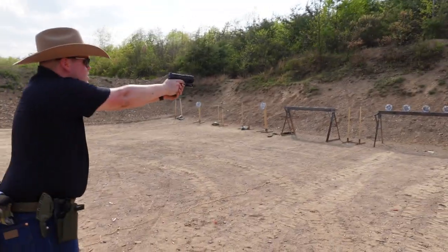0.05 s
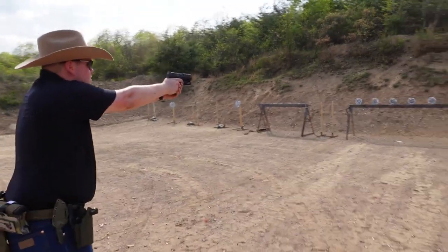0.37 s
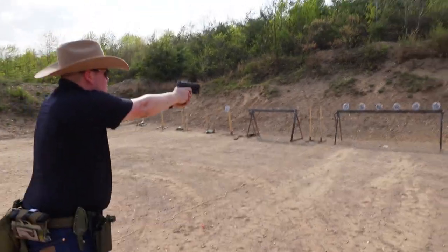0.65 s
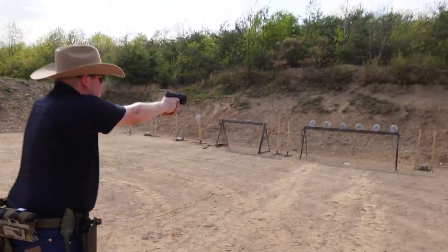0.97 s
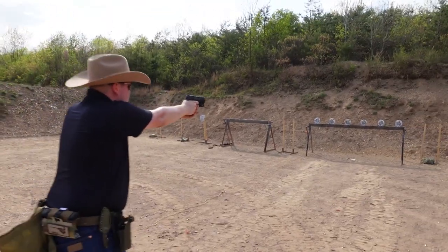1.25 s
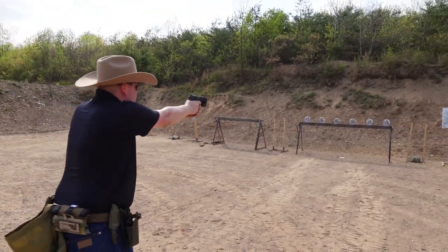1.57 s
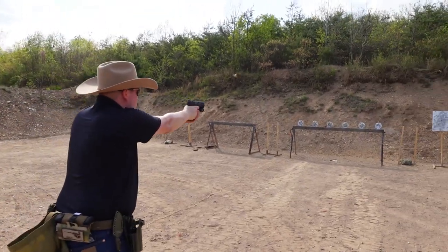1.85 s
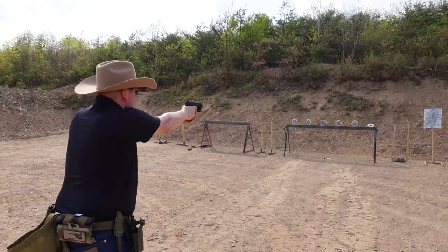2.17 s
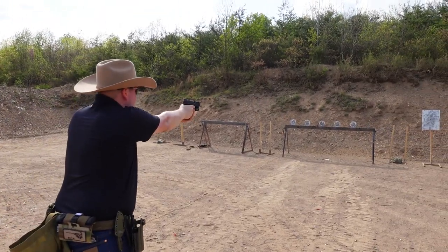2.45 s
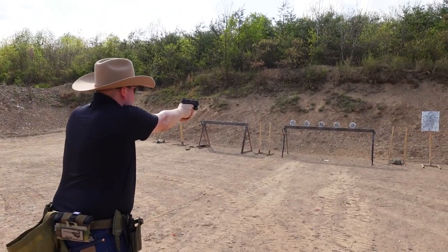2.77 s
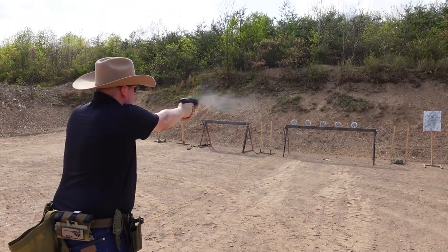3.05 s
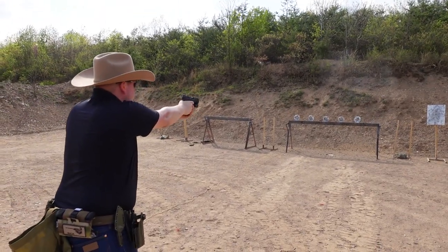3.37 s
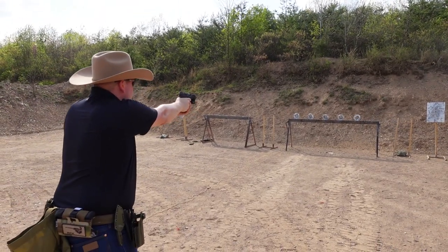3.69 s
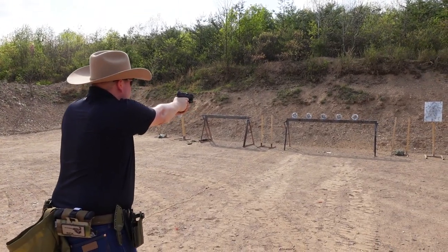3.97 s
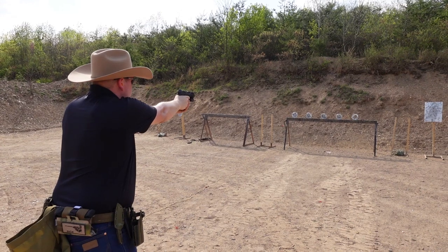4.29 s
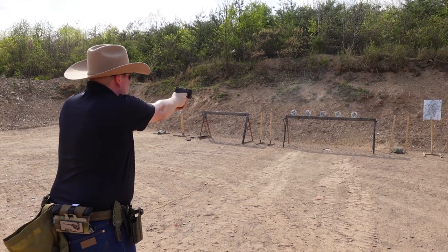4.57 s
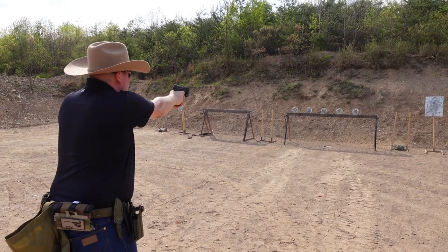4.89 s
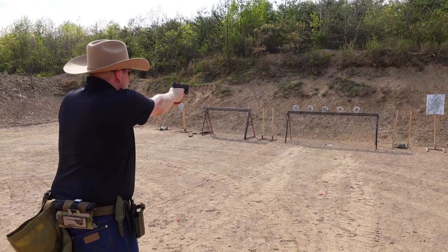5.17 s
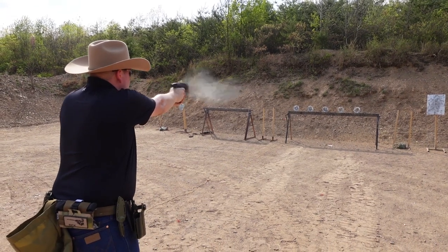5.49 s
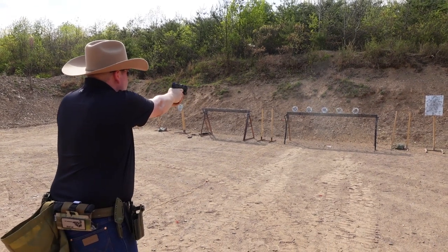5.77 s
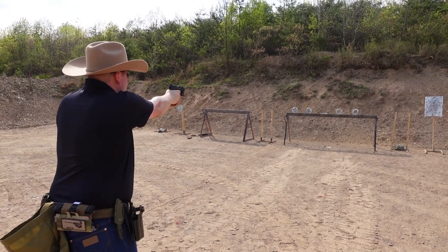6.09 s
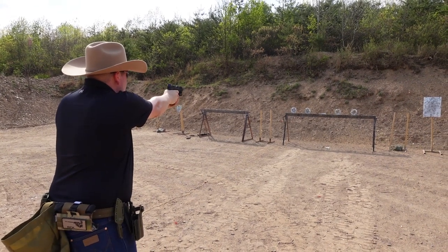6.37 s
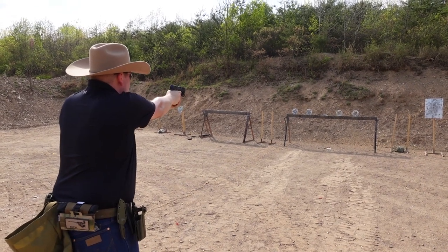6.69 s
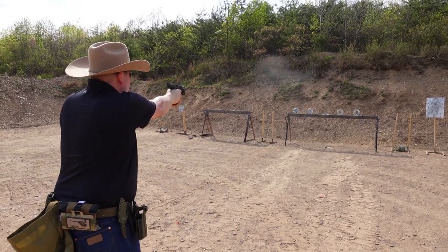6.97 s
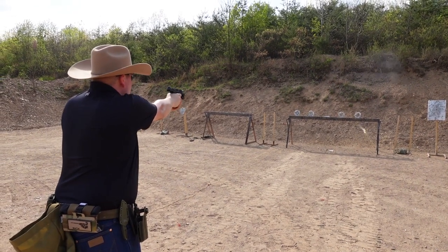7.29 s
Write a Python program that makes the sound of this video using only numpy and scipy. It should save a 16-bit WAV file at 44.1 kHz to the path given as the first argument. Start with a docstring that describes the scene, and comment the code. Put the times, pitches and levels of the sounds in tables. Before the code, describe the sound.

Light wind rumbles on the microphone and boots scuff faintly on dirt at an outdoor range. A nearby pistol then fires five single shots at a slow, even pace. Each sharp crack rolls back from the earth bank and woods, and a steel plate clangs and bounces on its rack just after. Two plates ring briefly when hit, and a few spent cases ping on the stones.

```python
"""Wind rumbles on the microphone at a dirt range, boots scuff and a bit of metal pings.
A trigger clicks and a pistol fires the first of five shots. Each crack comes back as a long roar from
the ground, the earth bank and the woods, then once more from a far hill. After each shot a steel plate
clangs on its rack and bounces; on the second and fourth shots the hit plate sings before it falls.
Among the later shots, spent cases ping on the stones."""
import sys
import numpy as np
from scipy import signal
from scipy.fft import rfft, irfft, next_fast_len
from scipy.io import wavfile
from scipy.ndimage import uniform_filter1d, map_coordinates

SR = 44100
rng = np.random.default_rng(int(sys.argv[2]) if len(sys.argv) > 2 else 0)


def inscribe(sig):
    """Save sig as 16-bit PCM at rate SR to the path in sys.argv[1].

    A 1-D sig is mono; a 2-D sig holds one channel per row.
    Samples are clipped to [-1, 1] before scaling.
    """
    pcm = np.round(np.clip(np.atleast_2d(sig).T, -1, 1) * 32767)
    wavfile.write(sys.argv[1], SR, pcm.astype(np.int16))


N = 332333
ECHO_SAMPLES = int(1.4 * SR)


def amp(db):
    """Turn decibels into a gain."""
    return 10 ** (np.asarray(db) / 20)


def unit(x):
    """Scale a sound to an average (rms) level of 1."""
    return x / np.sqrt(np.mean(x ** 2) + 1e-20)


def along(points, hz):
    """Read between the rows of a (pitch_hz, value) table."""
    pitches, values = np.transpose(points)
    return np.interp(np.log(hz + 1), np.log(pitches + 1), values)


def wobble(rate, size):
    """A smooth curve through `rate` random points a second."""
    knots = rng.standard_normal(int(size * rate / SR) + 4)
    return map_coordinates(knots, [np.arange(size) * rate / SR])


def filtered(x, response):
    """Turn each frequency up or down by response(hz)."""
    size = x.shape[-1]
    padded = next_fast_len(size + 8192)
    return irfft(rfft(x, padded) * response(np.fft.rfftfreq(padded, 1 / SR)), padded)[..., :size]


# how much left and right differ: pitch_hz, side_db
STEREO_WIDTH = [(60, -13), (250, -22.5), (500, -18), (2000, -15.5), (4000, -13.5), (8000, -10),
                (12000, -9.5)]
def noise(colour, size, width=STEREO_WIDTH, grain_db=0):
    """Stereo noise shaped by (pitch_hz, level_db) rows; grain_db makes it gritty."""
    white = rng.standard_normal((2, size)) * amp(grain_db * wobble(900, size))
    spread = lambda hz: np.array([np.ones_like(hz), amp(along(width, hz))])
    mid, side = filtered(white, lambda hz: amp(along(colour, hz)) * spread(hz))
    return unit(np.array([mid + side, mid - side]))


def add(track, start_s, sound):
    """Mix a sound into the track."""
    part = track[:, max(round(start_s * SR), 0):][:, :sound.shape[-1]]
    part += sound[..., :part.shape[-1]]


def swell(t, start_s, db, attack_s, hold_s, t60):
    """A gain that rises, holds and dies away; t60 is the seconds it takes to fade by 60 dB."""
    age = t - start_s
    return np.clip(age / attack_s, 0, 1) * amp(db - 60 * np.maximum(age - attack_s - hold_s, 0) / t60)


# loudness of the wind rumble (gusts, turned down by the recorder after the shots): time_s, level_db
RUMBLE_LEVEL = [(0.0, -45), (0.6, -46.5), (0.78, -53.0), (0.92, -44.5), (1.1, -48), (1.22, -42.0),
                (1.42, -42.5), (1.52, -55), (2.2, -57), (2.88, -44), (3.0, -54.5), (3.6, -68), (3.92, -61),
                (4.35, -57.5), (4.85, -51.5), (5.5, -53), (6.1, -64.5), (6.68, -70.5), (7.25, -63),
                (7.53, -69.5)]
# tone of the wind: pitch_hz, level_db
WIND_COLOUR = [(15, -49), (25, -34.5), (79, -1.5), (181, -0.5), (488, -13.5), (691, -18.5), (856, -27.5),
               (1180, -30.5), (1670, -35.5), (2070, -41), (3730, -46), (7090, -61.5), (15000, -66)]
# how much the wind differs left and right: pitch_hz, side_db
WIND_SPREAD = [(30, -5.5), (100, -5.5), (300, -1), (1000, -2), (8000, -2)]
def wind(wind_db, lumps_db, hiss_db):
    """Wind buffets the microphone; a faint steady hiss slowly dips and recovers with the recorder's level."""
    level = np.interp(np.arange(N) / SR, *np.transpose(RUMBLE_LEVEL))
    rush = noise(WIND_COLOUR, N, width=WIND_SPREAD)
    buffet = filtered(rush, lambda hz: 1 / (1 + (hz / 800) ** 4))
    slow_level = uniform_filter1d(level, size=SR // 2)
    hiss = amp(hiss_db + slow_level) * (rush - buffet)
    return amp(wind_db + level + lumps_db * wobble(24, N)) * buffet + hiss


def open_air():
    """The faint, steady hush of the air."""
    colour = [(100, -8.5), (700, 2.5), (2000, -18.5), (6000, -24.5), (10000, -30), (15000, -48)]
    return amp(-72.5) * noise(colour, N, width=WIND_SPREAD)


# boot scuffs: peak_s, level_db, length_s
BOOT_SCUFFS = [(0.128, -53.5, .013), (0.405, -63, .055), (.755, -59, .006), (0.782, -65.5, .016),
               (1.117, -55.5, 0.024)]
def boots():
    """Boots shift on the dirt in short puffs of gritty noise."""
    out, t = np.zeros((2, N)), np.arange(SR // 2) / SR
    colour = [(200, -5), (600, 3.5), (1000, -3.5), (2000, -7), (4500, -28), (12000, -48)]
    for peak_s, db, length_s in BOOT_SCUFFS:
        grit = noise(colour, len(t), grain_db=5)
        add(out, peak_s - 2 * length_s, amp(db) * grit * np.exp(-(t / length_s - 2) ** 2))
    return out


def tick(t, t60=.014):
    """A tiny metal tap: bright noise that dies at once."""
    colour = [(500, -13), (1800, 10.5), (4000, 4.5), (8000, -10), (12000, -11.5), (15000, -27)]
    return noise(colour, len(t)) * amp(-60 * t / t60)


# small metal pings: start_s, ring_db, pitch_hz, tick_db
METAL_PINGS = [(.9514, -60.5, 10890, -62), (3.9365, -66, 11020, -46.5), (5.225, -60.5, 10920, -49),
               (5.4116, -46, 10910, -45.5), (6.3743, -61, 10880, -48), (6.858, -28.5, 11170, -30.5)]
def pings(t60, split_hz):
    """Bits of metal, mostly cases landing, tick and ring with two close tones that beat."""
    out, t = np.zeros((2, N)), np.arange(SR // 2) / SR
    for start_s, ring_db, hz, tick_db in METAL_PINGS:
        ring = np.sin(2 * np.pi * (hz + split_hz) * t) + .38 * np.sin(2 * np.pi * (hz - split_hz) * t)
        ping = .6 * amp(ring_db - 60 * t / t60) * ring + amp(tick_db) * tick(t)
        add(out, start_s, ping * amp([[1.5], [-1.5]]))  # a little to the left
    return out


# trigger clicks: start_s, level_db
TRIGGER_CLICKS = [(1.6238, -46.5), (3.0657, -53), (4.3545, -58.5), (5.5088, -51), (6.731, -68),
                  (6.777, -54.5)]
def trigger():
    """The trigger gives way with a double click just before each shot."""
    out, t = np.zeros((2, N)), np.arange(SR // 2) / SR
    for start_s, db in TRIGGER_CLICKS:
        add(out, start_s, amp(db) * tick(t))
        add(out, start_s + .006, amp(db - 2.5) * tick(t))
    return out


# the shots: start_s, level_db
PISTOL_SHOTS = [(1.6455, -1.5), (3.0976, -1.5), (4.3877, -2.5), (5.5368, -4), (6.8015, -3.5)]
# tone of the crack and the striker: pitch_hz, level_db
GUN_COLOUR = [(60, -21), (400, -6), (1500, 7), (4000, -1), (8000, -7), (12000, -13.5), (16000, -26)]
def pistol(shared_echo, striker_db, crack_db, crack_s):
    """The striker ticks and the gun cracks; the land stays put, so shots share much of their echo."""
    out, t = np.zeros((2, N)), np.arange(SR // 20) / SR
    shared_roar = np.sqrt(shared_echo) * roar(dulling_db_per_s=17.5)
    for start_s, db in PISTOL_SHOTS:
        striker = amp(striker_db - 60 * t / .02) * noise(GUN_COLOUR, len(t))
        crack = amp(crack_db) * np.tanh(noise(GUN_COLOUR, len(t))) * np.exp(-(t / crack_s) ** 4)
        fresh_roar = np.sqrt(1 - shared_echo) * roar(dulling_db_per_s=18)
        slaps = slap_echoes(cycles=1.21, gain_db=-2.5, snap_db=-9)
        add(out, start_s - .0036, striker)
        add(out, start_s, amp(db) * crack)
        add(out, start_s, amp(db) * (shared_roar + fresh_roar + slaps))
    return out


def roar(dulling_db_per_s):
    """Countless small surfaces return the shot as one long roar."""
    t = np.arange(ECHO_SAMPLES) / SR
    return bank_echo(t) + boom(t) + woods_echo(t, dulling_db_per_s)


# tone of the bright echo: pitch_hz, level_db
BRIGHT_COLOUR = [(100, -32), (400, -10.5), (700, -1.5), (1100, 3.5), (1550, -4.5), (2200, 1), (3400, -1.5),
                 (5000, -4), (7000, -9), (10000, -18), (13000, -27.5), (16000, -44)]
def bank_echo(t, crest_s=.44, crest_width_s=.025, drop_db=-12):
    """Gravel, then the bank's stones and bushes, scatter the shot; less returns from past the crest."""
    gravel = swell(t, start_s=0, db=-26, attack_s=.001, hold_s=.08, t60=.5)
    bank = swell(t, start_s=.01, db=-21.5, attack_s=.088, hold_s=.047, t60=.91)
    crest = amp(drop_db * (1 + np.tanh((t - crest_s) / crest_width_s)) / 2)
    grit = noise(BRIGHT_COLOUR, len(t), grain_db=2) * amp(1.3 * wobble(160, len(t)))
    echo = crest * np.hypot(gravel, bank) * grit  # hypot adds their power
    soft = filtered(echo, lambda hz: 1 / (1 + (hz / 6500) ** 4))
    return soft + (echo - soft) * amp(-90 * np.maximum(t - .15, 0))  # farther bushes swallow the fizz


# tone of the boom: pitch_hz, level_db
DULL_COLOUR = [(25, -38.5), (60, -21), (120, -7), (280, -3), (430, -3), (600, 6), (900, -1.5), (1400, -4.5),
               (3000, -35.5), (8000, -70)]
def boom(t):
    """A dull thump around the shooter, then from the earth slope and the side mounds."""
    muzzle = swell(t, start_s=0, db=-26, attack_s=.001, hold_s=.004, t60=.29)
    slope = swell(t, start_s=.052, db=-23.5, attack_s=.013, hold_s=.041, t60=.16)
    mounds = swell(t, start_s=.087, db=-45.5, attack_s=.04, hold_s=.03, t60=.85)
    return np.sqrt(muzzle ** 2 + slope ** 2 + mounds ** 2) * noise(DULL_COLOUR, len(t))


# single faces of ground, bank, tree line and far hill: delay_s, level_db, pitch_hz
ECHO_FACES = [(.0058, -15.5, 562), (.0082, -18, 214), (.0538, -6, 1077), (.067, -10, 563), (.081, -10, 871),
              (.0959, -9.5, 839), (.098, -9, 478), (.1288, -13.5, 632), (.158, -7.5, 2110),
              (.163, -12.5, 750), (.186, -8.5, 1072), (.188, -16.5, 527), (.249, -23, 520),
              (.701, -31.5, 964), (.722, -26.5, 868), (.742, -30.5, 1170), (.765, -36.5, 790),
              (.817, -38, 845), (.886, -41.5, 1070)]
def slap_echoes(cycles, gain_db, snap_db):
    """Each face throws back a pulse of a wave or two with a gritty edge."""
    out, t = np.zeros((2, ECHO_SAMPLES)), np.arange(SR // 20) / SR
    for delay_s, db, hz in ECHO_FACES:
        loud, detune, shift = rng.standard_normal(3)
        turns = t * hz * (1 + .05 * detune)
        stretch = 1 + 2 * delay_s  # far slaps smear into thuds
        shape = np.sqrt(turns / stretch) * np.exp(-(turns / (cycles * stretch)) ** 2)
        pulse = np.sin(2 * np.pi * turns) * shape
        snap = amp(snap_db - 60 * t / (.0096 + .06 * delay_s)) * noise(TREE_COLOUR, len(t))
        air = signal.butter(2, min(2100 / (delay_s + .15), .45 * SR), fs=SR)  # far slaps lose treble
        slap = signal.lfilter(*air, pulse + snap)
        add(out, delay_s + .00018 * shift, amp(db + gain_db + 1.4 * loud) * slap)
    return out


# tone of the woods, also the grit of each slap: pitch_hz, level_db
TREE_COLOUR = [(60, -27), (300, -22), (560, -1), (800, 2), (1100, 2.5), (1550, -9), (2050, 2), (2600, -8.5),
               (3400, -5.5), (5000, -18.5), (8000, -53.5), (15000, -58)]
def woods_echo(t, dulling_db_per_s):
    """The woods answer, then the far hill; air dulls the longest paths."""
    trees = swell(t, start_s=.053, db=-32.5, attack_s=.1, hold_s=.17, t60=1.1)
    hill = swell(t, start_s=.69, db=-49.5, attack_s=.03, hold_s=.02, t60=1.12)
    echo = noise(TREE_COLOUR, len(t), grain_db=2) * amp(1.5 * wobble(70, len(t)))
    dull = filtered(echo, lambda hz: 1 / (1 + (hz / 2200) ** 4))
    return np.hypot(trees, hill) * (dull + (echo - dull) * amp(-dulling_db_per_s * t))


# plates fall on the rack: start_s, level_db, fade_s, note_hz, note_db
PLATE_FALLS = [(2.0132, -20.5, .33, 2182, -8.5), (2.3309, -23, 0.11, 2180, -5.5),
               (3.4679, -21, .37, 2810, -5), (4.6505, -20, .48, 2710, -7.5), (5.809, -22.5, .3, 2746, -5.5),
               (6.0175, -26.5, .17, 2863, -10), (7.0287, -22.5, .43, 2745, -4)]
# the last plate to fall bounces, with the same note: start_s, level_db
PLATE_BOUNCES = [(2.133, -31), (2.168, -36), (2.21, -33), (2.372, -30.5), (2.434, -31.5), (2.488, -42),
                 (3.545, -33), (4.765, -31.5), (5.918, -32), (6.044, -31.5), (6.108, -35), (6.132, -35.5),
                 (7.073, -27.5), (7.188, -43.5)]
# ringing tones of plate and rack: pitch_hz, level_db, fade_s
STEEL_TONES = [(850, -18, 0.28), (1935, -6, 0.49), (2183, 0, 0.51), (2726, -4, 0.54), (2870, -1, .35),
               (3254, 0, 0.84), (3340, -3.5, 0.39), (4400, -2, 0.78), (5280, -4, .36), (5480, -1, .33),
               (5860, -17, .36), (6700, -5.5, 0.24), (6880, -11.5, 0.85), (7260, -17.5, 0.14),
               (8400, -16, 0.36), (9100, -13, .35), (11300, -27, 0.9), (11720, -22.5, 0.98),
               (13080, -33, .45), (14640, -37.5, .35)]
# tone of the clatter: pitch_hz, level_db
CLATTER_COLOUR = [(200, -28.5), (600, -13.5), (1000, 0), (1600, -2.5), (2300, -1), (3000, 4), (4000, -1),
                  (5500, -3), (7500, -10), (10000, -21), (13000, -31), (16000, -43.5)]
def clangs(ring_db, clatter_db, note_gain_db, smack_db, attack_s, hold_s, settle_s, bounce_t60):
    """A falling plate smacks its stop and chatters there, with the steel ringing through."""
    out, t = np.zeros((2, N)), np.arange(SR // 2) / SR
    last_fall = lambda time_s: max(row for row in PLATE_FALLS if row[0] < time_s)
    bounces = [(s, db, bounce_t60, *last_fall(s)[3:]) for s, db in PLATE_BOUNCES]
    hz, tone_db, tone_t60 = np.transpose(STEEL_TONES)[:, :, None]
    after_hold = np.maximum(t - hold_s, 0)
    settle = amp(-10 * (t / settle_s) ** 3)  # coming to rest chokes the sound
    rack_hz = np.arange(0, SR / 2, 35)
    rack_tones = np.c_[rack_hz, 3.8 * rng.standard_normal(len(rack_hz))]  # countless weak tones
    smack_colour = [(500, -18.5), (2500, 1), (7000, .5), (10000, -10.5), (13000, -23), (16000, -37.5)]
    for start_s, db, t60, note_hz, note_db in list(PLATE_FALLS) + bounces:
        loud, detune, phase, spread = rng.standard_normal((4, len(STEEL_TONES), 1))
        angle = 2 * np.pi * (hz * (1 + .003 * detune) * t + phase) + 1.3 * wobble(90, len(t))
        fade = amp(tone_db + 4.2 * loud - 60 * t / tone_t60 - 35 * after_hold / t60)
        ring = np.array([(fade * np.sin(angle + side * .16 * spread)).sum(0) for side in (1, -1)])
        clatter = unit(filtered(noise(CLATTER_COLOUR, len(t)), lambda f: amp(along(rack_tones, f))))
        note = np.sin(2 * np.pi * note_hz * t + 1.3 * wobble(140, len(t)))
        note *= amp(note_gain_db + note_db + 1.8 * wobble(110, len(t)))
        chatter = amp(clatter_db) * clatter + note
        chatter *= amp(1.2 * wobble(110, len(t)) - 60 * after_hold / t60)
        smack = amp(smack_db - 60 * t / .061) * noise(smack_colour, len(t))
        rise = 1 - np.exp(-t / (attack_s * amp(-18.5 - db)))  # gentle bounces start more softly
        add(out, start_s, amp(db) * (amp(ring_db) * ring + chatter + smack) * rise * settle)
    return out


# hits that leave a plate singing: start_s, level_db, upright_s
SINGING_HITS = [(3.14, -32.5, 0.03), (5.59, -20, .16)]
# one list of tones for each hit: pitch_hz, level_db
SINGING_TONES = [
    [(3768, 1), (6503, -15.5), (9981, -13), (11700, -20), (13440, -21.5)],
    [(3795, 0), (6837, -17.5), (10060, -34), (13600, -46)],
]
def singing_plates(attack_s, sag_db_per_s, t60, flutter_db, sway_db):
    """A hit plate rings like a fluttering bell, fading slowly while upright and fast once it tips."""
    out, t = np.zeros(N), np.arange(N) / SR
    for (start_s, peak_db, upright_s), tones in zip(SINGING_HITS, SINGING_TONES):
        note = np.zeros(N)
        for hz, db in tones:
            flutter = amp(db + flutter_db * wobble(45, N))
            note += flutter * np.sin(2 * np.pi * hz * t + .25 * wobble(45, N))
        standing_s = np.clip(t - start_s - attack_s, 0, upright_s)
        sag = amp(sway_db * wobble(14, N) - sag_db_per_s * standing_s)
        out += np.sqrt(2) * swell(t, start_s, peak_db, attack_s, upright_s, t60) * sag * note
    return out * amp([[-.7], [.7]])  # a little to the right


def scene():
    """Everything on the range, in the order it is first heard."""
    out = wind(wind_db=2, lumps_db=2.3, hiss_db=2) + open_air()
    out += boots() + pings(t60=.3, split_hz=50) + trigger()
    out += pistol(shared_echo=.55, striker_db=-45, crack_db=-15.5, crack_s=.0019)
    out += clangs(ring_db=-11, clatter_db=-4, note_gain_db=-.5, smack_db=-3.5,
                  attack_s=.0007, hold_s=.019, settle_s=.25, bounce_t60=.24)
    return out + singing_plates(attack_s=.064, sag_db_per_s=25, t60=.54, flutter_db=2, sway_db=.1)


def record(dry):
    """The microphone thins the deep bass, rounds off the loudest peaks and cuts the highest treble."""
    thinned = signal.sosfilt(signal.butter(2, 48, "high", fs=SR, output="sos"), dry)
    rounded = thinned / (1 + (thinned / .45) ** 4) ** (1 / 4)
    return filtered(rounded, lambda hz: hz < 16000)


dry = scene()
out = record(dry)
inscribe(out)
```